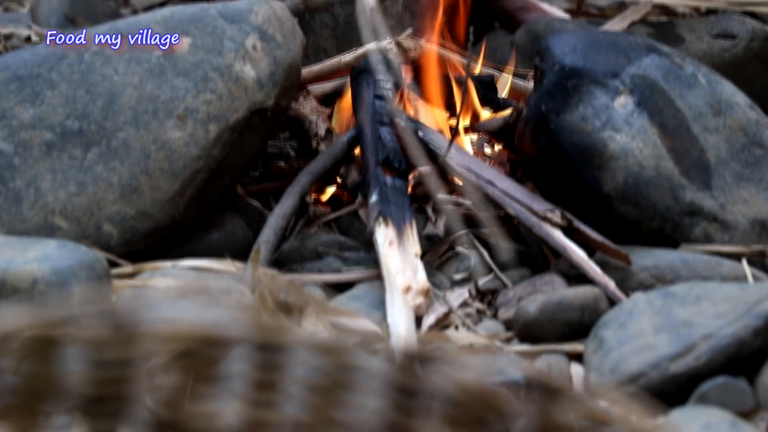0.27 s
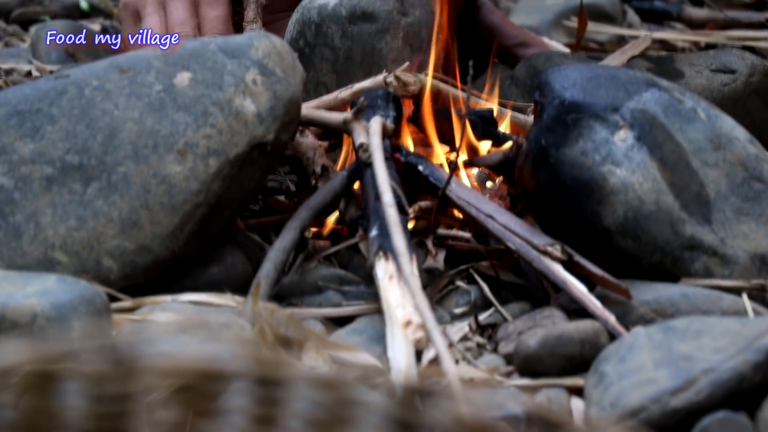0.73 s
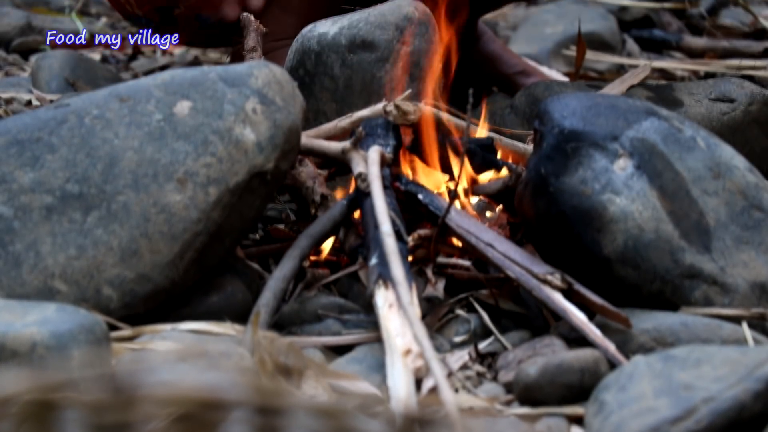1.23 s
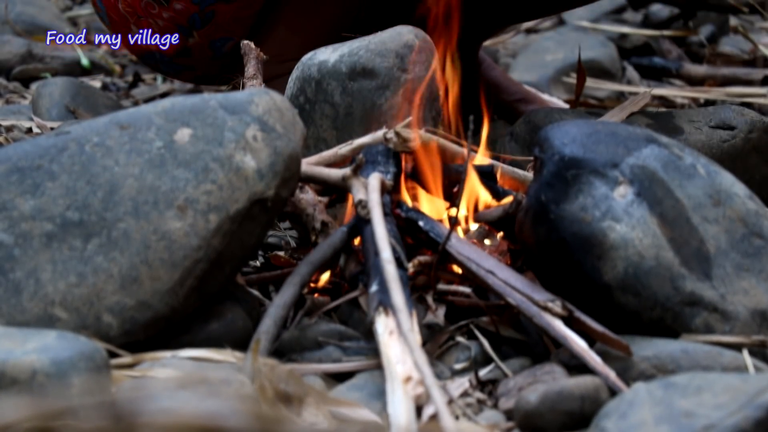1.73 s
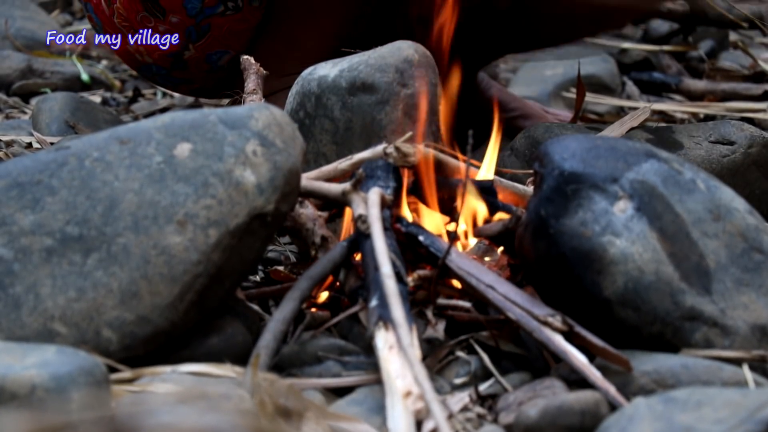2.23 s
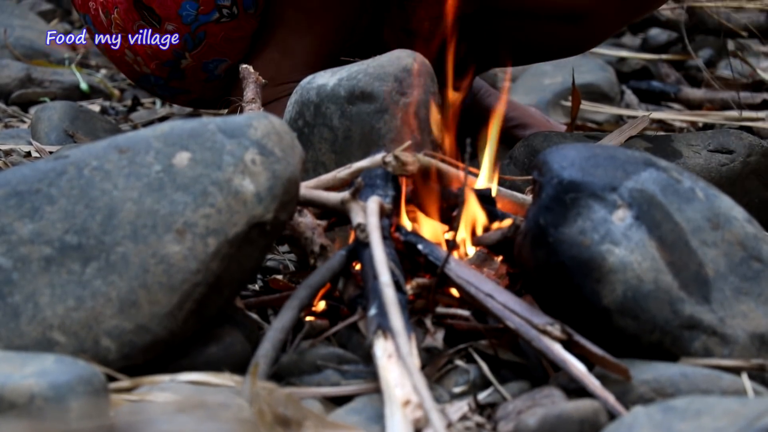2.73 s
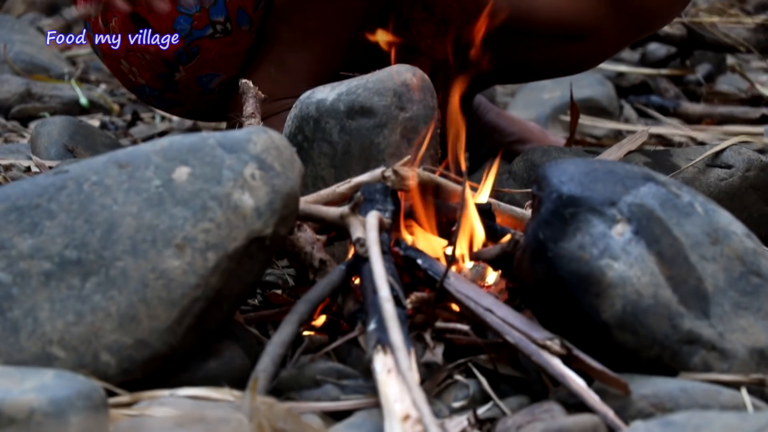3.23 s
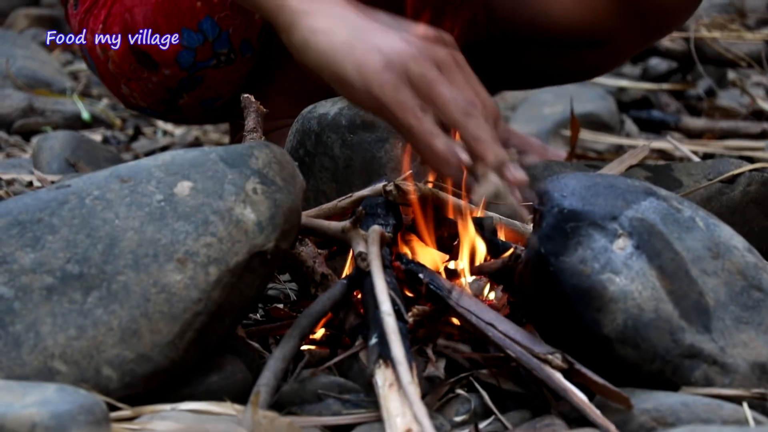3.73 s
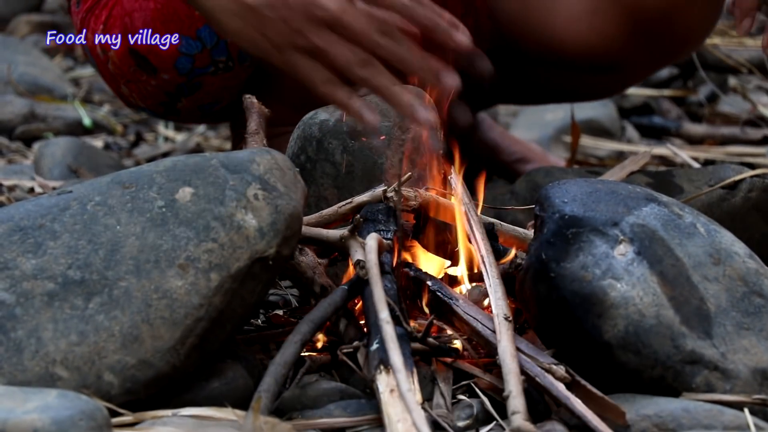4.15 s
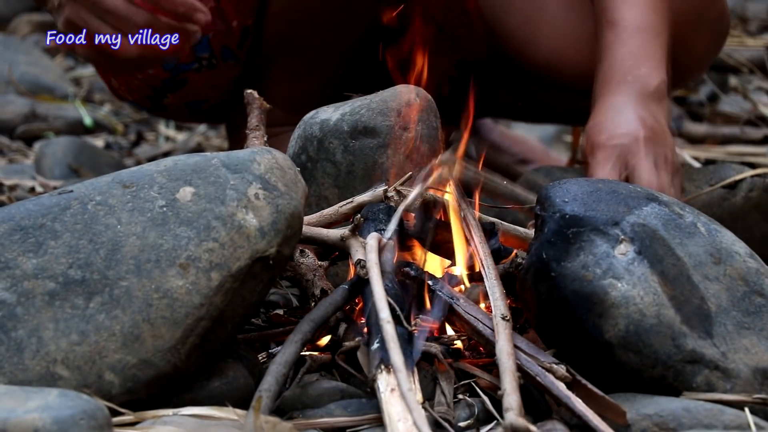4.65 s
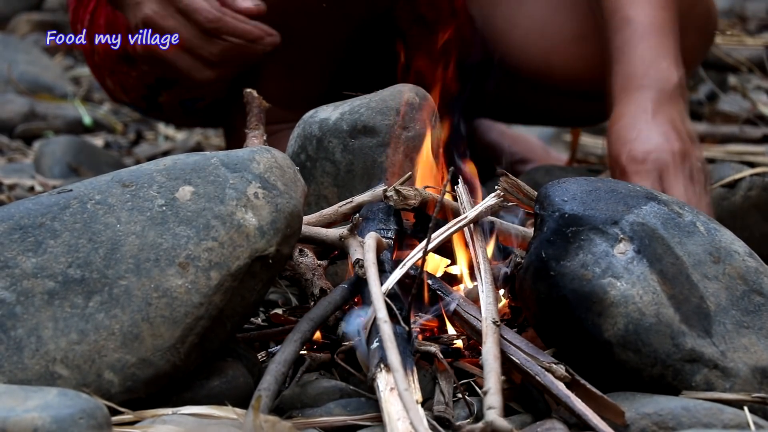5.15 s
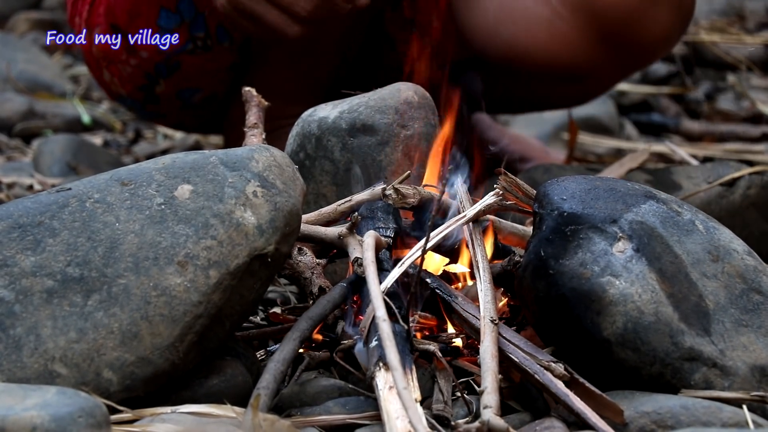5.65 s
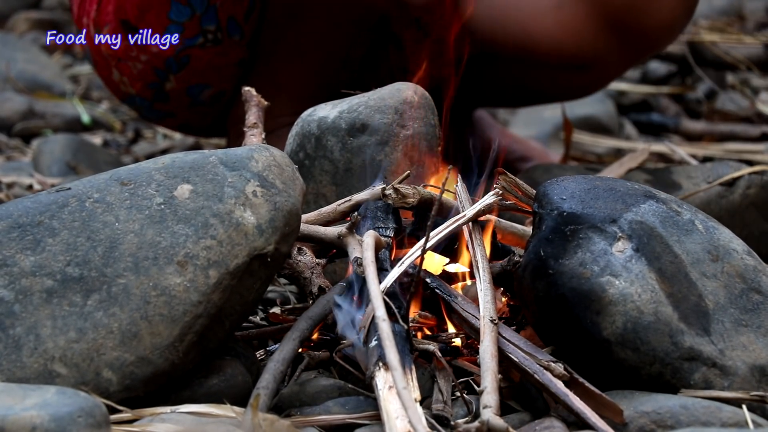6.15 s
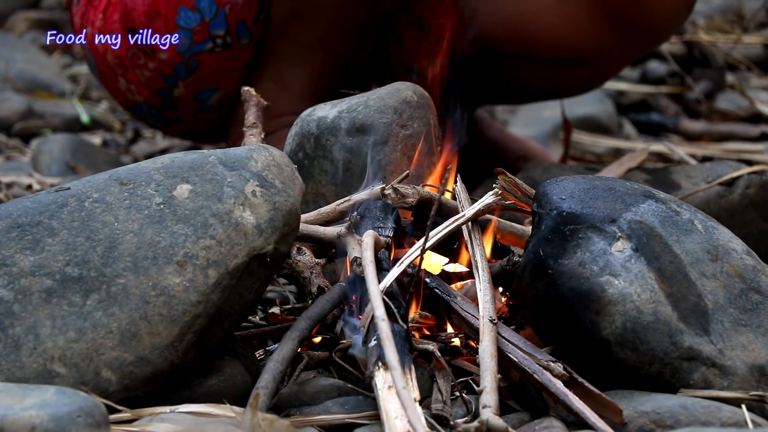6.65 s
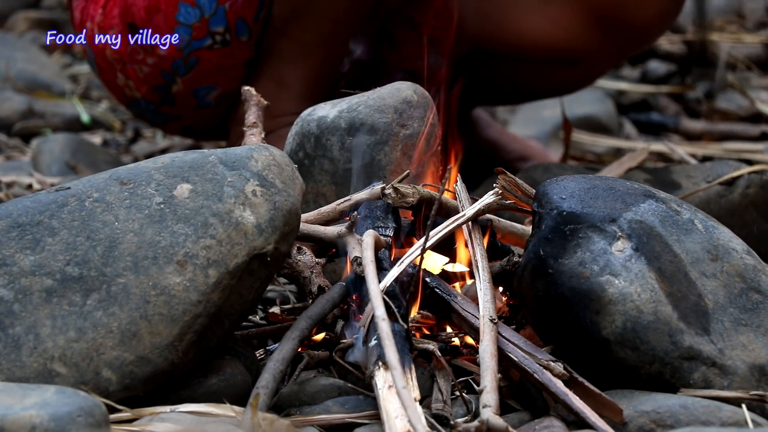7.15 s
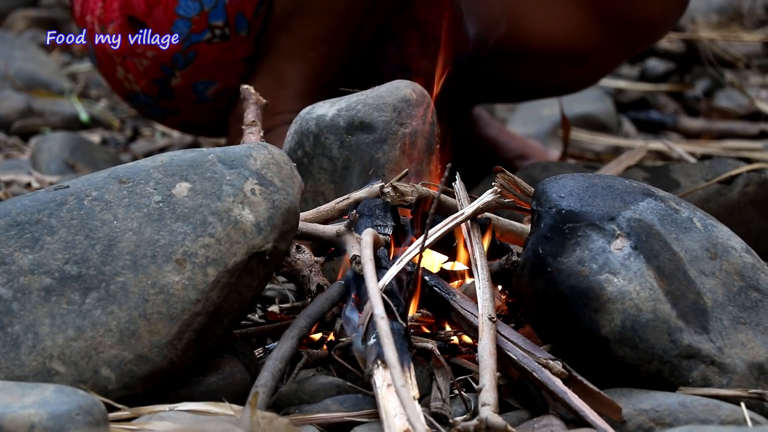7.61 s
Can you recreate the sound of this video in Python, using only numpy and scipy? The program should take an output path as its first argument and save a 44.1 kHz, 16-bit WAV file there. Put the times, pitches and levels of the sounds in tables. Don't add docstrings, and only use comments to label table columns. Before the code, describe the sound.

Thin dry twigs tick and rustle in a small fire, heard very near in open air. A sudden hard crack and steam hiss stands far above the quiet bed, followed by smaller snaps and a brief sap whistle. Soft woody knocks follow as sticks are added, then a faint wheeze, renewed crackling and another sharp cluster of pops. High insect song, temporarily lower, a low distant motor and gentle microphone hiss continue behind.

```python
import sys
import numpy as np
from scipy import signal
from scipy.fft import rfft, irfft
from scipy.io import wavfile
from scipy.ndimage import uniform_filter1d

SR = 44100
rng = np.random.default_rng(int(sys.argv[2]) if len(sys.argv) > 2 else 0)


def inscribe(sig):
    pcm = np.round(np.clip(np.atleast_2d(sig).T, -1, 1) * 32767)
    wavfile.write(sys.argv[1], SR, pcm.astype(np.int16))


def how_loud(loudness_db):
    steps = np.asarray(loudness_db, float) / 20
    return 10 ** steps


N = 347508
T = np.arange(N) / SR

# start_s, peak_db, loudest_hz, body_db (below 2 kHz), steam_db (re the peak)
POCKETS = [(2.1511, -16, 5300, -36, -14), (2.1675, -27, 9860, -13, -13), (2.199, -28, 4920, -3, -15),
           (2.2205, -3.5, 5130, -9.5, -10.5), (2.404, -41.5, 4870, -5, -8),
           (2.5404, -28, 13300, -12.5, -21), (2.5463, -38, 6040, -5, -15), (2.5517, -33, 13100, -12, -14),
           (2.5535, -37, 13100, -12, -12), (2.558, -26.5, 12890, -15, -12), (2.5628, -30, 13550, -5, -18),
           (2.5666, -27, 11200, -11, -16), (2.5676, -25, 13500, -11, -14), (2.5687, -37, 11500, -11, -14),
           (2.5714, -41, 13400, -8.5, -19), (2.6014, -34, 10000, 8, -16.5), (2.6019, -28.5, 5330, 8, -12.5),
           (2.7278, -44, 5310, -7, -7.5), (2.762, -40.5, 3700, -2, -9), (6.9686, -18.5, 6500, -7, -11),
           (6.9793, -27, 5020, -1, -17), (6.984, -16, 5300, -4, -29), (6.9909, -15.5, 4570, 3.5, -13.5),
           (6.9936, -18, 4660, 6, -12.5), (7.0315, -39, 8000, 21, -18)]
# frequency_hz, gain_db
BAND_LIMIT = [(15700, 0), (15800, -90)]


def level(x, db):
    return x * how_loud(db) / np.sqrt(np.mean(x ** 2))


def gains(table, count):
    hz, db = np.transpose(table)
    bin_hz = np.arange(count // 2 + 1) * SR / count
    return how_loud(np.interp(np.log(bin_hz + 1), np.log(hz), db))


def shape(x, table):
    return irfft(rfft(x) * gains(table, len(x)), len(x))


def colour(x, table):
    return level(shape(x, table), 0)


def hump(hz, octaves, below_db, above_db):
    return [(hz / 2 ** octaves, below_db), (hz, 0), (hz * 2 ** octaves, above_db)]


def walk(rate):
    k = int(SR / rate)
    held = np.repeat(rng.standard_normal(N // k + 1), k)
    return uniform_filter1d(uniform_filter1d(held, k), k)[:N]


def add(out, s, sound):
    i = int(s * SR)
    out[i:i + len(sound)] += sound[:N - i]


def burst(noise, rise_s, t60):
    t = np.arange(len(noise)) / SR
    rise = 1 - np.exp(-(t / rise_s) ** 2)
    y = noise * rise * how_loud(-60 * t / max(t60, .002))
    return y / np.abs(y).max()


def clicks(table, octaves, rise_s, skirts_db=None):
    out = np.zeros(N)
    for s, db, hz, t60, *own_db in table:
        spectrum = hump(hz, octaves, *(own_db or skirts_db)) + [(hz * 3 ** octaves, -40)]
        noise = colour(rng.standard_normal(8192), spectrum)
        add(out, s, how_loud(db) * burst(noise, rise_s, t60))
    return shape(out, BAND_LIMIT)


def tone(rows, rough):
    s, hz, db = np.transpose(rows)
    fade = np.clip(np.minimum(T - s[0], s[-1] - T) / 0.014, 0, 1)
    phase = 2 * np.pi * np.cumsum(np.interp(T, s, hz)) / SR
    wave = np.sin(phase) * (1 + rough * walk(300))
    return np.sqrt(2) * wave * fade * how_loud(np.interp(T, s, db))


def outdoor_air():
    # frequency_hz, density_db (per Hz)
    air_spectrum = [(15, 0.5), (40, -5), (110, -5.5), (165, -5.5), (200, -10.5), (450, -17.5),
                    (1200, -16.5), (3000, -28.5), (9000, -26.5), (15000, -32.5)]
    return level(colour(colour(rng.standard_normal(N), air_spectrum), BAND_LIMIT), -71)


def engine():
    harmonics = [(2, -88), (3, -89.5), (4, -83.5), (5, -83), (6, -86.5), (7, -87.5), (8, -80.5), (9, -95),
                 (10, -77.5), (11, -81.5), (12, -99), (14, -99), (15, -91)]
    firing_hz = 14.68
    turn = 2 * np.pi * np.cumsum(firing_hz * (1 + 0.0014 * walk(1.1))) / SR
    out = np.zeros(N)
    for k, db in harmonics:
        wavering = how_loud(db + 1.8 * walk(3.7))
        out += np.sqrt(2) * wavering * np.sin(k * turn + 3.2 * rng.random())
    return out


def insects():
    # frequency_hz, density_db (per Hz)
    song_high = [(4300, -27), (4870, -11.5), (5250, -1.5), (5440, 2.5), (5700, -3), (5830, 1), (6250, -5.5),
                 (7100, 0), (7250, -5.5), (7570, 1), (8050, -0.5), (8400, -5.5), (9400, -16.5),
                 (11000, -33)]
    # frequency_hz, density_db (per Hz)
    song_low = [(2470, -44), (4200, -21.5), (4390, -20.5), (4500, -8), (4750, -1), (5340, -2.5),
                (5990, 1.5), (6350, -2), (7210, -2.5), (7730, -10.5), (8070, -18), (8650, -13.5),
                (10000, -26), (13000, -59), (22000, -120)]
    # time_s, pitch_hz, level_db
    near_chirp = [(1.305, 7500, -74), (1.34, 7500, -71), (1.36, 7000, -76), (1.42, 7400, -76)]
    choir_db = -59
    sag_s, sag_takes_s, recover_s, recover_takes_s = 2.96, 0.12, 4.75, .18
    falling = np.tanh((T - sag_s) / sag_takes_s / 2)
    recovering = np.tanh((T - recover_s) / recover_takes_s / 2)
    low = np.clip(np.interp((falling - recovering) / 2, (0, 1), (.05, 0.92)), 0, 1)
    echoes = np.zeros(N)
    echoes[rng.integers(100, 1500, 12)] = 0.1 * rng.standard_normal(12)
    echoes[0] = 1
    high_voices, low_voices = [colour(rng.standard_normal(N), song) * how_loud(walk(8.1))
                               for song in (song_high, song_low)]
    choir = np.sqrt(1 - low) * high_voices + np.sqrt(low) * low_voices
    choir = level(irfft(rfft(choir) * rfft(echoes), N), choir_db)
    return colour(choir + tone(near_chirp, rough=5.3), BAND_LIMIT) * how_loud(choir_db)


def faint_pips():
    when, pitch, size = rng.random((3, 60))
    low_hz, high_hz = 600, 3500
    hz = low_hz * (high_hz / low_hz) ** pitch
    pips = [(s * T[-1], -75 + 10 * g, f, .06) for s, f, g in zip(when, hz, size)]
    return clicks(pips, .3, .003, (-20, -20))


def whistles():
    # time_s, pitch_hz, level_db
    jets = [
        [(2.3, 1290, -75), (2.316, 1387, -68), (2.36, 1405, -70), (2.375, 1361, -70), (2.39, 1330, -77)],
        [(2.97, 668, -79), (3.03, 702, -74.5), (3.112, 788, -77), (3.164, 815, -71), (3.23, 812, -82.5)],
    ]
    return sum(tone(rows, rough=0.59) for rows in jets)


def wheeze():
    # centre_hz, width_hz, gain_db
    resonances = [(800, 90, -7), (1030, 80, -5), (2000, 300, 0), (2350, 150, -5), (3250, 120, -4)]
    middle_s, lasts_s = 5.49, .19
    hz = np.arange(N // 2 + 1) * SR / N
    pipe = sum(how_loud(db) / (1 + (2 * (hz - f_hz) / width) ** 2) for f_hz, width, db in resonances)
    swell = np.exp(-((T - middle_s) / (lasts_s / 2)) ** 2) * how_loud(2.0 * walk(37))
    return level(irfft(rfft(rng.standard_normal(N)) * pipe, N), -70.5) * swell


def sticks():
    # start_s, peak_db, pitch_hz, t60_s
    soft_knocks = [(2.049, -61.5, 244, .15), (3.713, -70, 225, 0.12), (4.014, -58.5, 382, 0.14),
                   (4.039, -59, 372, 0.13), (4.229, -63, 260, 0.14), (4.269, -66, 282, .13),
                   (4.309, -63, 311, 0.1), (4.51, -68, 626, 0.19), (4.779, -65, 500, 0.14),
                   (5.064, -58.5, 295, 0.071), (5.18, -66, 903, 0.028), (5.421, -61.5, 254, 0.1),
                   (7.753, -59, 387, 0.06), (7.859, -59, 225, .11)]
    # start_s, peak_db, pitch_hz, t60_s
    dull_thuds = [
        (.089, -58, 550, 0.061),
        (.422, -61, 600, 0.066),
        (.621, -58.5, 594, 0.04),
        (2.2206, -40, 330, .045),
        (2.2206, -41, 800, .03),
        (2.6, -56, 434, 0.062),
        (3.816, -57, 600, 0.098),
        (6.418, -59, 774, 0.045),
        (6.9685, -45.5, 1050, 0.027),
        (7.658, -49, 600, 0.071),
    ]
    knocks = clicks(soft_knocks, .55, 0.0091, (-26, -24))
    return knocks + clicks(dull_thuds, 0.9, 0.0048, (-14, -14))


def rustle():
    # time_s, level_db
    heat_stir = [(0, -72.5), (.88, -75), (1.21, -70), (2.0, -71.5), (2.81, -71), (3.56, -71.5),
                 (4.3, -76.5), (4.89, -71.5), (5.4, -76), (5.88, -67.5), (6.28, -71), (6.67, -77),
                 (7.35, -69), (7.88, -69.5)]
    # middle_s, length_s, dull_db (1.5-4 kHz), bright_db (10-15 kHz)
    slides = [(0.43, 0.021, -64, -76), (0.995, 0.052, -65, -69), (1.265, 0.13, -71.5, -71),
              (1.552, .05, -73, -74), (1.885, 0.088, -71, -74), (2.533, 0.031, -60, -51),
              (2.595, 0.012, -80, -58), (2.734, 0.015, -64, -56), (2.76, 0.015, -57, -53),
              (3.835, 0.027, -68, -82), (4.041, .04, -66, -64.5), (4.15, .05, -71, -76),
              (4.711, 0.014, -65, -80), (4.758, 0.086, -80, -78), (5.789, 0.1, -67, -75.5),
              (6.008, 0.069, -73.5, -78), (6.158, 0.094, -85, -73), (6.444, 0.041, -72, -79),
              (6.881, 0.038, -75, -71.5), (6.958, 0.01, -58, -58), (7.033, 0.035, -87, -67),
              (7.189, 0.015, -82, -72), (7.77, 0.073, -69.5, -72)]
    stir_db = np.interp(T, *np.transpose(heat_stir))
    bright_db = -79.5 + 1.5 * (stir_db + 72)
    swell = how_loud(np.array([stir_db, bright_db]) - 3.5)
    cinders_db, cinders_t60_s = np.array([-50.5, -52]), 0.61
    for s, db, *_ in POCKETS:
        i = int(s * SR)
        decay = how_loud(-60 * (T[i:i + SR] - s) / cinders_t60_s)
        swell[:, i:i + SR] += how_loud(db + cinders_db)[:, None] * decay
    for mid, length, *db in slides:
        near = slice(int((mid - 2 * length) * SR), int((mid + 2 * length) * SR))
        swell[:, near] += how_loud(np.array(db))[:, None] * np.exp(-((T[near] - mid) / (length / 2)) ** 2)
    sizes = np.minimum(rng.exponential(size=(2, N // 32 + 1)), 6)
    grain_gain = how_loud(2.3 * sizes).repeat(32, axis=1)[:, :N]
    grains = rng.standard_normal((2, N)) * grain_gain
    dull = colour(grains[0], [(300, -14.5), (900, -10), (3500, 1.0), (5000, 1.0), (8000, -25.5)])
    bright = colour(grains[1], [(6000, -24.5), (9500, 3.0), (13000, 0.5), (15500, -2.0)])
    return dull * swell[0] + colour(bright, BAND_LIMIT) * swell[1]


def twigs():
    # start_s, peak_db, pitch_hz, below_db (far below that pitch)
    twig_ticks = [(0.1134, -48.5, 2210, -14), (0.4237, -44.5, 3640, -7.5), (0.6187, -50, 3760, -13),
                  (1.2624, -42.5, 3540, -19), (1.4993, -54, 2830, -6), (2.0188, -49.5, 4040, -22),
                  (2.5085, -44.5, 3530, -25), (2.7954, -53, 1360, -4), (2.9236, -58, 3600, -18),
                  (2.982, -59.5, 2690, -12), (3.0476, -61, 3700, -12.5), (3.4078, -61, 1154, -12),
                  (3.979, -61.5, 1360, -11), (4.403, -59, 2500, -6), (4.4973, -62, 2500, -11.5),
                  (4.5452, -57, 3700, -12), (4.607, -61, 2600, -10), (4.7627, -60, 4300, -9.5),
                  (4.8126, -59, 2000, -10), (5.0201, -62, 3170, -12), (5.0875, -60, 1970, -12),
                  (5.309, -62, 2080, -12), (5.345, -67, 3220, -12), (5.6587, -57.5, 3000, -11),
                  (5.6901, -57, 2900, -11.5), (.241, -59, 2000, -8), (3.8881, -52, 3900, -16),
                  (4.0083, -48, 3340, -23), (5.7228, -51.5, 4230, -14), (5.788, -49.5, 3430, -0.5),
                  (5.8173, -40.5, 4100, -19), (5.9319, -51, 4260, -21), (5.9496, -54.5, 2650, -15),
                  (5.989, -49.5, 3590, -21), (6.3626, -51, 3880, -16), (6.4203, -48.5, 2250, -16),
                  (6.8573, -54, 1400, -30), (6.9385, -40, 4060, -14), (7.1662, -41, 4500, -17),
                  (7.1705, -44, 3200, -16), (7.357, -61, 3390, -16), (7.418, -49, 1184, -35),
                  (7.6742, -43.5, 3500, -17), (7.3893, -55, 3500, -12), (7.3028, -59, 4000, -17),
                  (7.7633, -49.5, 3470, -1), (7.7816, -44.5, 3700, -19)]
    t60_s, above_db = 0.025, -12.5
    rows = [(s, db, hz, t60_s, below_db, above_db) for s, db, hz, below_db in twig_ticks]
    return clicks(rows, 1.44, 0.00054)


def snaps():
    # start_s, peak_db, pitch_hz
    fibres = [(0.0942, -36.5, 9000), (.117, -52, 12000), (.6203, -45, 12000), (1.2632, -36, 11200),
              (1.3105, -40, 12000), (1.5085, -48, 10600), (2.1519, -21.5, 5500), (2.188, -27, 10020),
              (2.2208, -8, 8950), (2.2425, -22, 12500), (2.2607, -28, 10990), (2.2775, -36, 7950),
              (2.2885, -35, 11980), (2.3045, -32, 12500), (2.308, -39, 12400), (2.371, -43, 12000),
              (2.4047, -42, 9000), (2.5115, -38, 12500), (2.54, -29, 12000), (2.5456, -38.5, 6000),
              (2.5574, -23, 13000), (2.563, -24, 10000), (2.5782, -33, 11000), (2.5865, -39, 11000),
              (2.647, -46, 12100), (2.9247, -35, 11500), (3.888, -45, 13000), (4.0097, -52, 11000),
              (4.0236, -37.5, 10600), (4.4046, -51, 11000), (4.7061, -51, 11900), (5.2242, -41, 11400),
              (5.7244, -54, 10100), (5.8208, -42, 10000), (6.0738, -47, 10000), (6.1608, -49.5, 13000),
              (6.5956, -48, 11000), (6.6317, -47, 10000), (6.8507, -48, 12000), (6.8664, -36, 12000),
              (6.889, -43, 12200), (6.9099, -45, 12400), (6.936, -45, 11500), (6.958, -44, 11000),
              (6.969, -10, 7030), (6.977, -22, 6000), (7.0314, -29, 7000), (7.1944, -51, 10000),
              (7.235, -44.5, 11000), (7.2644, -46, 10000), (7.3028, -51, 10000), (7.3583, -41, 11000),
              (7.3893, -53, 9000), (7.5892, -34.5, 10060), (7.6743, -29.5, 10500), (7.7003, -49, 11500),
              (7.748, -52, 11500), (7.7822, -42, 10700), (6.9944, -16, 6000), (6.985, -17.5, 7980)]
    out, t = np.zeros(N), np.arange(1024) / SR
    for s, db, hz in fibres:
        u = (t * hz - 1) / 0.21
        shock = u * np.exp(.5 - u ** 2 / 2)
        scatter = colour(rng.standard_normal(len(t)), hump(hz, 1.2, -13.5, -9.5))
        tail = burst(scatter, 0.00024, .008)
        add(out, s - 1 / hz, how_loud(db) * (shock + how_loud(-11.5) * tail))
    return shape(out, [(1000, -12), (4000, -3.5), (13000, 2)])


def rings():
    # (pitch_hz, level_db, t60_s)
    blows = [
        (0.088, -46.5, [(1620, 2.5, 0.016), (2230, -1.5, 0.081)]),
        (0.0924, -41.5, [(3540, -2, 0.018), (4480, -9, 0.015), (5000, -12, .025)]),
        (2.1513, -15, [(2850, -5, 0.011), (3750, 3, 0.0092), (4600, -15, 0.013), (5400, -8, 0.018), (6400, -9, .015)]),
        (6.972, -12, [(3860, -3, 0.0056), (4530, -5, 0.0076), (5500, -2, 0.0048)]),
        (2.2207, -1, None),
        (3.8185, -44, [(1100, 1.5, 0.012), (1590, -5, .012), (2130, -6, .015), (2750, -4, 0.018)]),
        (4.0224, -34, [(1310, -3.5, 0.021), (2160, 2.5, 0.021), (3320, -2, 0.023), (4400, -4, 0.026)]),
        (4.7059, -49, [(498, -2, 0.058), (820, -7.5, 0.059), (1103, -8, 0.057), (1860, -6, 0.026), (2920, -3, 0.026), (4160, -1, 0.02)]),
        (7.0918, -36, [(2410, -2, 0.026), (3550, 1, 0.022), (4400, 0, .015)]),
        (2.602, -31, [(1500, -10.5, 0.016), (3600, -6, .015), (5330, 0, 0.018)]),
    ]
    # pitch_hz, level_db, t60_s
    split_modes = [(960, -26.5, .04), (1393, -26, 0.043), (2270, -13, 0.016), (2900, -6, .012),
                   (3360, -1, 0.014), (3760, -10.5, 0.03), (4760, 0, 0.0099), (5330, -1.5, 0.014),
                   (6100, -10, 0.015)]
    out, t = np.zeros(N), np.arange(8192) / SR
    for s, db, modes in blows:
        modes = modes or split_modes
        ring = np.zeros(len(t))
        for hz, mode_db, t60 in modes:
            ring += how_loud(mode_db - 60 * t / t60) * np.sin(2 * np.pi * (hz * t + rng.random()))
        ring *= 1 - np.exp(-(t / 0.000083) ** 2)
        low_hz, *_, high_hz = [hz for hz, mode_db, t60 in modes if mode_db > -15]
        band = [(low_hz / 3, -25), (low_hz, 0), (high_hz, 0), (2.0 * high_hz, -25)]
        scuff = burst(colour(rng.standard_normal(len(t)), band), 0.00013, 0.0066)
        ring = ring / np.abs(ring).max() + how_loud(-3.5) * scuff
        lowest_hz = modes[0][0]
        ring = colour(ring, [(lowest_hz / 2, -16), (lowest_hz * .85, 0)])
        add(out, s, how_loud(db) * ring / np.abs(ring).max())
    return out


def pops():
    # frequency_hz, density_db (per Hz)
    crack_spectrum = [(120, -65.5), (200, -36), (1180, -13), (1810, -12.5), (2210, -9.5), (4350, -7.5),
                      (5130, -4.5), (6520, -14), (8580, -13), (12600, -5.5), (16000, -21)]
    # frequency_hz, density_db (per Hz)
    steam_spectrum = [(180, -53.5), (300, -21.5), (537, -24.5), (701, -20.5), (1810, -15), (3700, -3),
                      (6410, -7), (12900, -11), (16000, -18.5)]
    out = np.zeros(N)
    for s, db, hz, body_db, steam_db in POCKETS:
        wood_noise, steam_noise, spit_noise = rng.standard_normal((3, 16384))
        wood = colour(colour(wood_noise, crack_spectrum), [(1300, body_db), (2600, 0)])
        crack_t60 = .015 * (5000 / hz) ** 1.1
        crack = burst(colour(wood, hump(hz, 1.9, -12, -14.0)), 0.00039, crack_t60)
        spit = how_loud(17 * uniform_filter1d(spit_noise, size=64))
        steam_t60 = 0.13 * np.exp(0.017 * (db + steam_db + 40.5)) * (5000 / hz) ** 0.83
        jet = colour(colour(steam_noise, steam_spectrum), hump(hz, 1.8, -7.0, -1.5))
        steam = burst(jet * spit, .003, steam_t60)
        add(out, s, how_loud(db) * (crack + how_loud(steam_db) * steam))
    return out


def scene():
    # frequency_hz, gain_db
    crack_band = [(150, -12), (1200, 0.0), (15900, 1.0), (16300, -8), (16750, -20), (16900, -80)]
    background = outdoor_air() + insects() + faint_pips()
    sap = whistles() + wheeze()
    fire = rustle() + twigs() + shape(snaps() + rings() + pops(), crack_band)
    middle = background + sap + sticks() + fire
    return middle + engine() * how_loud(np.array([[-.4], [.4]]))


def low_pass(x):
    return signal.sosfilt(signal.butter(12, 16790, fs=SR, output="sos"), x)


def record(dry):
    # frequency_hz, density_db (per Hz)
    hiss_spectrum = [(15, -0.5), (30, 4), (150, -3), (270, -2), (600, -6.5), (4000, -10.5), (10000, -11),
                     (15000, -9.5)]
    hiss = [level(colour(colour(rng.standard_normal(N), hiss_spectrum), BAND_LIMIT), -71) for _ in dry]
    rounded = np.tanh((dry + np.array(hiss)) / 2.2) * 2.2
    return low_pass(rounded)


dry = scene()
out = record(dry)
inscribe(out)
```